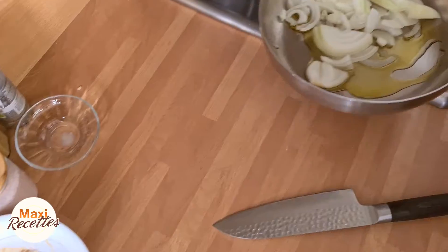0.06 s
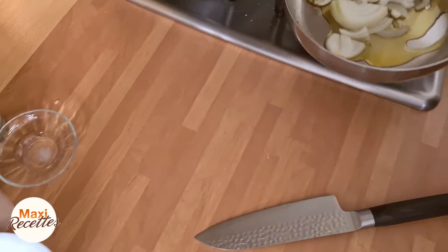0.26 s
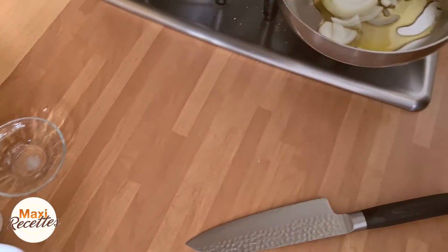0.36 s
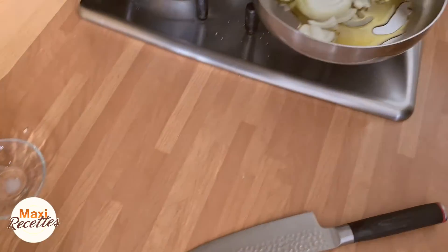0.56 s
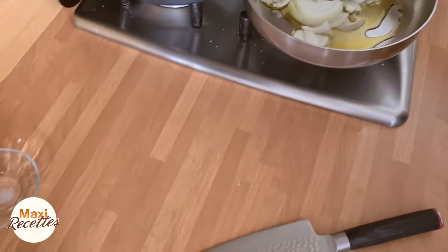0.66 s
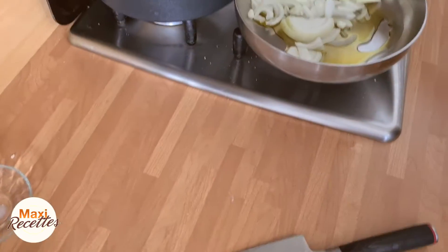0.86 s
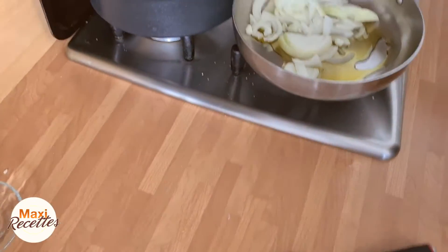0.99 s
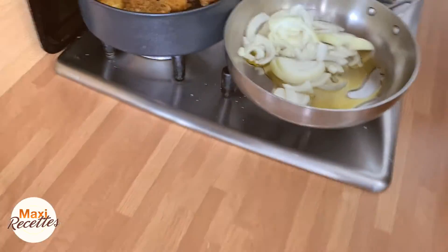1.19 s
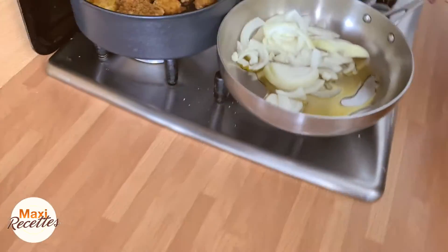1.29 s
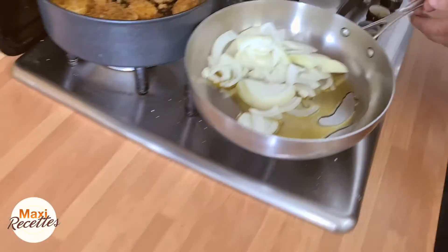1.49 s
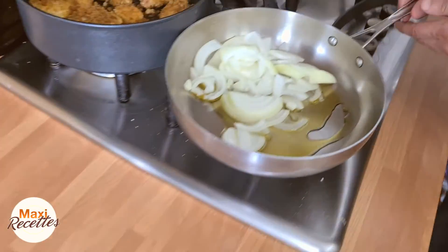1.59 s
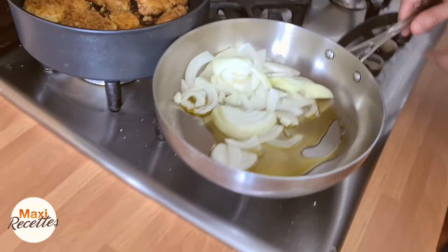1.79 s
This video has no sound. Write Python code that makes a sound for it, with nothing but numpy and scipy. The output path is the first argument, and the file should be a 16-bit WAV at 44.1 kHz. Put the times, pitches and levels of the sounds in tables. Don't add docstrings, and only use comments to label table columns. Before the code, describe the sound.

Metal pan set on a hob with a dull clank, rocking and nudged, oil quietly frying nearby.

```python
import sys
import numpy as np
from scipy import signal
from scipy.fft import rfft, irfft, next_fast_len
from scipy.io import wavfile
from scipy.ndimage import uniform_filter1d, map_coordinates

SR = 44100
rng = np.random.default_rng(int(sys.argv[2]) if len(sys.argv) > 2 else 0)


def field_ratio(decibels):
    return 10 ** (np.asarray(decibels, dtype=float) / 20)


def store_wav(level_fs):
    pcm = np.round(np.clip(np.atleast_2d(level_fs), -1, 1) * 32767)
    wavfile.write(sys.argv[1], SR, pcm.T.astype(np.int16))


N = 81585
T = np.arange(N) / SR
# start_s, end_s
GAP_S = (.0325, .0468)
LOOSE, RATTLY, FIRM = 0.03, 0.11, 0.008


def unit(x):
    return x / np.sqrt(np.mean(x ** 2) + 1e-20)


def along(points, hz):
    f, v = np.transpose(points)
    return np.interp(np.log(hz + 1), np.log(f + 1), v)


def curve(rows):
    return np.interp(T, *np.transpose(rows))


def wobble(knots_per_s):
    knots = rng.standard_normal(int(N * knots_per_s / SR) + 4)
    return map_coordinates(knots, [T * knots_per_s])


def filtered(x, response):
    m = next_fast_len(N + SR // 2)
    return irfft(rfft(x, m) * response(np.fft.rfftfreq(m, 1 / SR)), m)[..., :N]


def add(track, start_s, sound):
    part = track[:, round(start_s * SR):][:, :sound.shape[1]]
    part += sound[:, :part.shape[1]]


def from_left(pair):
    late_s = np.array([[0], [0.00019]])
    return filtered(pair, lambda hz: np.exp(-2j * np.pi * hz * late_s))


def frying():
    # time_s, level_db
    strength = [(0, -50.5), (.2, -49), (.5, -51), (.8, -50.5), (1.0, -48.5), (1.2, -49.5), (1.5, -48),
                (1.85, -49)]
    # freq_hz, density_db
    hiss_spectrum = [(25, -16), (70, -1), (300, -8), (600, -5.5), (1700, -4), (4200, -4.5), (6600, -8),
                     (7400, -12.5), (16000, -13)]
    # freq_hz, correlation
    likeness = [(100, 0.26), (400, 0.95), (1500, 0.41), (5000, 0.067), (12000, 0.036)]
    hiss_db, fizz_db, fizz_per_s = 3.5, -5.5, 600

    chosen = rng.random((2, N)) < fizz_per_s / SR
    fizz = rng.standard_normal((2, N)) * field_ratio(13.0 * rng.random((2, N))) * chosen
    bubbling = rng.standard_normal((2, N)) + field_ratio(fizz_db) * unit(fizz)
    spectrum = signal.stft(bubbling, nperseg=256)[2]
    patches = uniform_filter1d(rng.standard_normal(spectrum.shape[1:]), 8, 0)
    patches = uniform_filter1d(patches, 6, 1)
    pair = signal.istft(spectrum * field_ratio(1.6 * unit(patches)), nperseg=256)[1][:, :N]

    def mid_side(hz):
        angle = np.arccos(np.clip(along(likeness, hz), -1, 1)) / 2
        return field_ratio(along(hiss_spectrum, hz)) * [np.cos(angle), np.sin(angle)]

    mid, side = filtered(pair, mid_side)
    level_db = curve(strength) + hiss_db + 0.6 * wobble(7.34)
    return field_ratio(level_db) * unit(np.array([mid + side, mid - side]))


def spits():
    # start_s, peak_db, pitch_hz, width_octaves
    drops = [(0.0268, -34, 5000, 3.4), (0.0582, -34, 5100, 4.5), (0.1055, -32.5, 11500, 1),
             (.1271, -47, 3500, 1.7), (0.186, -29, 14600, .4), (0.3527, -36, 10000, .6),
             (0.374, -39, 13500, .5), (0.414, -38, 10300, 0.4), (.424, -35, 12900, .5),
             (0.45, -33, 6200, 0.31), (0.4966, -32.5, 10600, 1.2), (.51, -35, 12000, .6),
             (.6075, -42, 8700, 0.33), (.6479, -30.5, 9350, 0.94), (0.6933, -32, 11500, 1.2),
             (.705, -38, 10000, 0.69), (0.7289, -28.5, 4540, 1.4), (.7567, -32, 11100, 1),
             (0.8068, -30.5, 10800, 0.65), (0.8364, -29.5, 3950, 0.7), (0.8868, -24.5, 6900, 0.13),
             (0.891, -32, 6900, 0.21), (0.9152, -31.5, 4400, 0.76), (0.9562, -31.5, 3100, 0.63),
             (1.064, -36, 5750, 0.46), (1.1119, -37, 12000, .7), (1.1513, -33.5, 5600, 1),
             (1.2037, -42, 9900, 0.71), (1.2303, -28, 2460, 0.76), (1.231, -30, 10100, 1.4),
             (1.2793, -27, 5500, 0.22), (1.2783, -29, 2440, 1.7), (1.3462, -32, 12900, 0.44),
             (1.3934, -31, 9250, 0.25), (1.418, -30, 5650, 1.6), (1.4361, -30.5, 4000, 0.25),
             (1.5075, -24.5, 3000, 0.42), (1.5763, -38, 13000, .6), (1.6206, -29, 3420, 1.2),
             (1.8, -34, 5260, 2)]
    spit_db, spit_s = -1, 0.0034
    out, t = np.zeros((2, N)), T[:SR // 40]
    for start_s, db, hz, octaves in drops:
        noise = rng.standard_normal((3, len(t)))
        low_hz = hz / 2 ** (abs(octaves) / 2 + 0.017)
        high_hz = min(hz * 2 ** (abs(octaves) / 2), 17000)
        band = signal.butter(2, [low_hz, high_hz], "bandpass", fs=SR)
        puff = signal.lfilter(*band, noise[0] + noise[1:] / 2)
        add(out, start_s, field_ratio(db + spit_db - 8.7 * t / spit_s) * unit(puff) / 2)
    return from_left(out)


def drone():
    # start_s, level_db, rise_s
    kicks = [(0.044, -46, 0.0028), (.2, -24.5, 0.028), (.27, -28, 0.014), (.49, -48.5, 0.0077),
             (0.716, -33.5, 0.029), (.9, -43.5, 0.046), (1.09, -49.5, 0.021), (1.32, -55, 0.007),
             (1.48, -39, 0.021), (1.54, -41.5, 0.015), (1.71, -52, 0.022)]
    pitch_hz, wander_hz, t60_s = 56.9, 3.14, 0.38
    idle_db, upper_db = -57.5, -13.5
    phase = 2 * np.pi * np.cumsum(pitch_hz + wander_hz * wobble(26.08)) / SR
    swing = field_ratio(idle_db + 4.2 * wobble(11.73)) * (T > GAP_S[1])
    for start_s, db, rise_s in kicks:
        t = np.maximum(T - start_s, 0)
        kick = 2 * field_ratio(db - 60 * t / t60_s) * (1 - np.exp(-(t / rise_s) ** 2))
        swing = np.hypot(swing, kick)
    upper = field_ratio(upper_db + 4 * wobble(20)) * np.sin(2.2 * phase)
    return swing * (np.sin(phase) + upper) * field_ratio([[0.6], [-0.6]])


def ring(modes, spread_db, turn, dull_hz, rough):
    hz, db, t60 = np.transpose(modes)[:, :, None]
    t = T[:SR // 3]
    chance = rng.standard_normal((3, len(modes), 1))
    size = field_ratio(db + spread_db * chance[0] - 60 * t / t60) / (1 + (hz / dull_hz) ** 3)
    wander = rough * np.clip(0.15 / t60, 0.3, 1.5) * rng.standard_normal(size.shape).cumsum(axis=1)
    apart = turn * np.minimum(hz / 500, 1) ** 2 * chance[1]
    phase = 2 * np.pi * hz * t + 0.26 * chance[2] + wander
    return np.array([np.sum(size * np.sin(phase + side * apart), axis=0) for side in (1, -1)])


def grate_contacts():
    # freq_hz, level_db, t60_s
    grate_modes = [(393, -15, 0.083), (560, -7.5, 0.14), (740, 14, 0.024), (806.6, 5, 0.47),
                   (1170, -17, 0.05), (1290, 12, 0.082), (1337, 7, 0.16), (1388, 6.5, 0.13),
                   (1482, -2, 0.079), (1780, 7, 0.061), (2100, -25, 0.055)]
    # start_s, length_s, level_db, favoured_hz
    contacts = [(0.182, 0.026, -38, 467), (.2015, 0.014, -29, 1750), (.225, 0.0084, -20, 1420),
                (.288, 0.02, -35, 1290), (0.317, 0.083, -46.5, 1270), (0.406, 0.098, -43.5, 1324),
                (.43, 0.068, -39, 760), (0.499, 0.057, -43.5, 560), (0.546, 0.036, -44.5, 716),
                (.63, 0.024, -59, 1360), (1.151, 0.049, -46, 1670), (1.671, 0.056, -45, 880)]
    out = np.zeros((2, N))
    for start_s, length_s, db, near_hz in contacts:
        count = round(length_s * SR)
        slips = np.hanning(count) ** 0.5 * rng.standard_normal(count)
        favoured = [(f, g - 35 * abs(np.log2(f / near_hz)), 0.65 * t60) for f, g, t60 in grate_modes]
        answer = ring(favoured, spread_db=1.0, turn=0.29, dull_hz=3000, rough=FIRM)
        answer = answer / np.linalg.norm(answer[0])
        add(out, start_s, field_ratio(db) * signal.fftconvolve(slips[None], answer, axes=1))
    return out


def knocks(hits, modes, rough, thud_db, thud_s, rise_s):
    out, t = np.zeros((2, N)), T[:SR // 3]
    for start_s, db, hard_hz in hits:
        noise = rng.standard_normal((3, len(t)))
        band = signal.butter(5, [130, min(hard_hz, 15000)], "bandpass", fs=SR, output="sos")
        burst = signal.sosfilt(band, noise[0] + 0.59 * noise[1:])
        thud = field_ratio(thud_db - 60 * t / thud_s) * unit(burst)
        tone = ring(modes, spread_db=2.5, turn=0.58, dull_hz=hard_hz, rough=rough)
        add(out, start_s, field_ratio(db) * (tone + thud) * (1 - np.exp(-t / rise_s)))
    return out


def pan():
    # freq_hz, level_db, t60_s
    landing_modes = [(137, -5, 0.172), (175, -2.5, 0.09), (209, 1, 0.12), (348, -12, 0.16),
                     (410.4, -8, 0.12), (499.3, -3, 0.1), (565, -6.5, 0.33), (678.7, 7.5, 0.058),
                     (706.2, 5, 0.24), (754, 2, 0.061), (800, -0.5, 0.14), (929, -0.5, 0.081),
                     (1097, 5, 0.045), (1199, 0, 0.1)]
    rim_modes = [(2380, 1, 0.048), (2694, 1, 0.11), (3000, -1.5, 0.13), (3310, -3, 0.42),
                 (3614, -4.5, 0.37), (3837, -1, 0.15), (4400, -8, 0.08), (6200, 6.5, 0.025),
                 (6406, 14, 0.069), (6400, -8, 0.065)]
    handle_modes = [(5480, 7.5, 0.036), (8660, -14, 0.18), (10600, 1.5, 0.086)]
    nudge_modes = [(148, -9, 0.12), (204.3, 1, 0.11), (336, 0.5, .1), (400, -1, 0.046), (482, 5.5, 0.09),
                   (612, 8, 0.043), (701.6, 4, 0.13), (757, 9.5, 0.086), (956, -0.5, 0.076),
                   (1030, -18, 0.038), (1290, -18, 0.25), (1346, -4, 0.2), (1750, -4, .04)]
    rock_modes = [(126, -3, 0.14), (195, -3, 0.097), (420, -5, 0.14), (560, 0, .12), (694, 3, 0.11),
                  (766.6, 11, 0.07), (860, 4.5, 0.065), (993, 1, 0.067), (1155, 4.5, 0.061),
                  (1305, -8.5, 0.59), (1385, 2.5, .06), (1916, -2, 0.27), (2040, -6, 0.035)]
    touch_modes = [(111, -12, 0.3), (291, -7.5, .15), (399, -8, 0.086), (624, -11.5, 0.11),
                   (834, -1.5, 0.34), (1200, -3.5, 0.075), (1310, -8, 0.062), (1486, -7, 0.14),
                   (2430, -18, .06), (3150, -7, 0.065)]
    settle_modes = [(119, -10, 0.08), (211, -3.5, 0.14), (331, -0.5, 0.13), (484, 9, 0.037),
                    (573, 7, 0.035), (695, -1, 0.094), (795, 3, 0.095), (1084, -21.5, 0.084),
                    (1330, 3, 0.12), (1490, -31, .06)]
    # start_s, level_db, hardness_hz
    landing_hits = [
        (.2012, -14, 1420),
        (.2225, -19.5, 454),
        (.232, -28, 900),
        (.272, -32.5, 1200),
        (.2895, -25.5, 1330),
        (.3065, -27, 1070),
        (.3235, -27, 830),
        (.36, -36.5, 796),
    ]
    rim_hits = [
        (.2045, -35, 12200),
        (.212, -38, 12000),
        (.226, -53, 9100),
    ]
    nudge_hits = [
        (.6128, -29.5, 1280),
        (.6185, -37, 800),
        (.627, -28.5, 500),
        (.644, -33, 516),
    ]
    rock_hits = [
        (.6745, -35, 2500),
        (.681, -35, 1300),
        (.6925, -28, 930),
        (.712, -48, 890),
        (.722, -34, 307),
        (1.18, -46, 170),
        (1.225, -47, 169),
        (1.635, -40, 190),
    ]
    touch_hits = [
        (1.478, -35.5, 3000),
        (1.483, -34.5, 1500),
        (1.5075, -44, 4000),
    ]
    settle_hits = [
        (1.548, -25, 985),
        (1.552, -31.5, 780),
        (1.565, -29, 463),
        (1.579, -40.5, 760),
        (1.596, -41, 417),
    ]

    landing = knocks(landing_hits, landing_modes, LOOSE, thud_db=0, thud_s=0.083, rise_s=0.0018)
    rim = knocks(rim_hits, rim_modes, RATTLY, thud_db=-21, thud_s=0.025, rise_s=0.00099)
    handle = knocks(rim_hits[:1], handle_modes, FIRM, thud_db=-32, thud_s=0.02, rise_s=0.0055)
    nudge = knocks(nudge_hits, nudge_modes, LOOSE, thud_db=3.5, thud_s=0.04, rise_s=0.00081)
    rock = knocks(rock_hits, rock_modes, LOOSE, thud_db=-3, thud_s=0.06, rise_s=0.0012)
    touch = knocks(touch_hits, touch_modes, FIRM, thud_db=-5, thud_s=0.052, rise_s=0.0012)
    settle = knocks(settle_hits, settle_modes, LOOSE, thud_db=-0.5, thud_s=0.11, rise_s=0.0013)
    return (landing * field_ratio([[-1.5], [1.5]]) + rim * field_ratio([[1.2], [-1.2]]) + handle * field_ratio(13.5)
            + nudge * field_ratio([[-0.8], [0.8]]) + rock * field_ratio([[-0.7], [0.7]]) + touch + settle + grate_contacts())


def kitchen(x):
    # freq_hz, t60_s
    room_decay = [(150, 0.58), (1000, 0.29), (8000, 0.17)]
    hz, t, z = signal.stft(rng.standard_normal((2, SR // 2)), SR, nperseg=256)
    fade = field_ratio(-60 * t / along(room_decay, hz)[:, None])
    tail = signal.istft(z * fade, SR, nperseg=256)[1]
    delayed = np.pad(x, ((0, 0), (300, 0)))
    return signal.fftconvolve(delayed, tail / np.linalg.norm(tail[0]), axes=1)[:, :N]


def scene():
    near = pan() + spits()
    room = filtered(kitchen(near), lambda hz: hz ** 2 / (hz ** 2 + 300 ** 2))
    return near + field_ratio(-8) * room + from_left(frying()) + drone()


def low_pass(x):
    return signal.sosfilt(signal.butter(12, 16660, fs=SR, output="sos"), x)


def record(dry):
    ports_hz, low_hz, top_hz, overload = 200, 38, 15900, 0.78
    gate = np.where((T > GAP_S[0]) & (T < GAP_S[1]), 0.004, 1)
    side = 0.32 * filtered(dry[0] - dry[1], lambda hz: ports_hz ** 2 / (hz ** 2 + ports_hz ** 2))
    narrowed = dry - [side, -side]
    x = filtered(narrowed, lambda hz: (hz < top_hz) / (1 + (low_hz / (hz + 1)) ** 4)) * gate
    held = x / (1 + np.abs(x / overload) ** 4) ** 0.25
    return low_pass(held)


dry = scene()
out = record(dry)
store_wav(out)
```